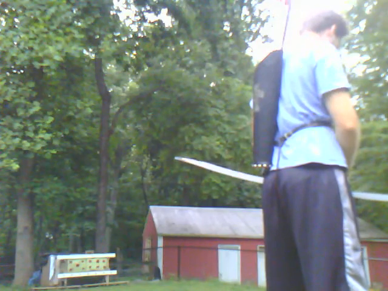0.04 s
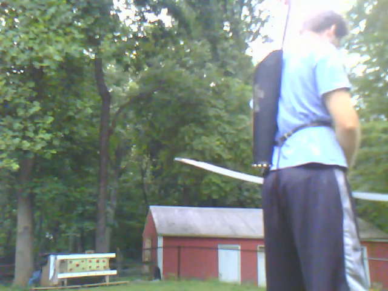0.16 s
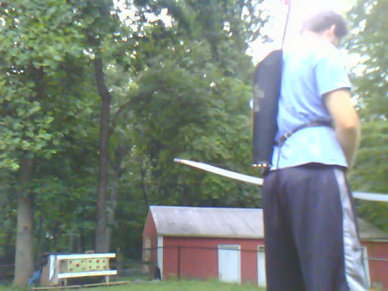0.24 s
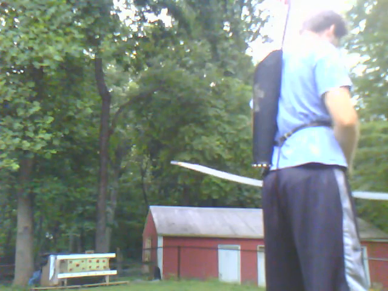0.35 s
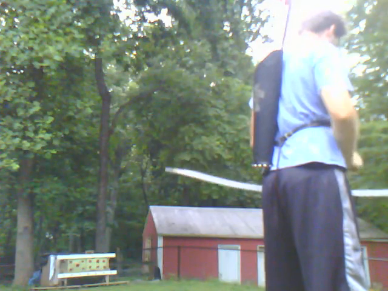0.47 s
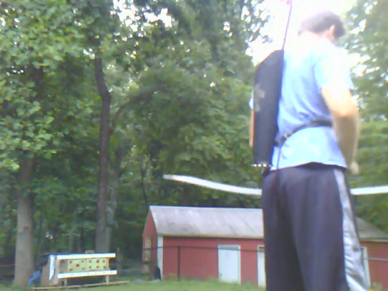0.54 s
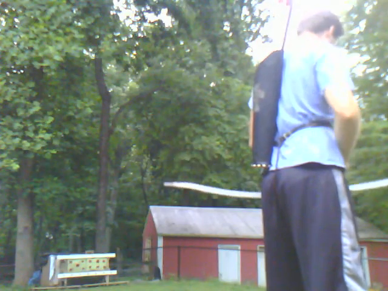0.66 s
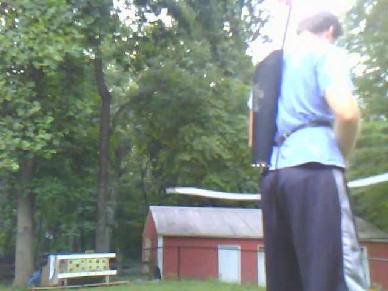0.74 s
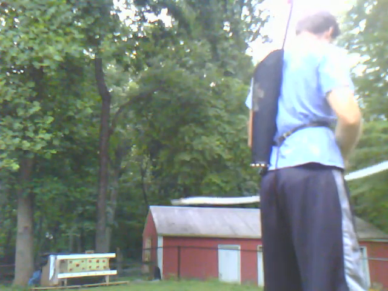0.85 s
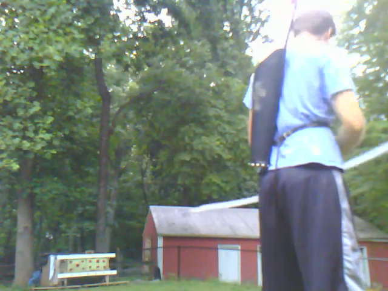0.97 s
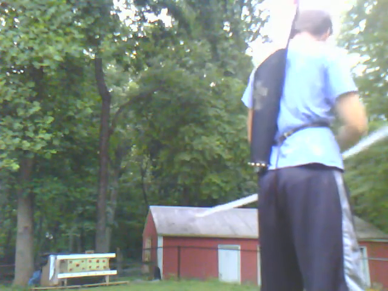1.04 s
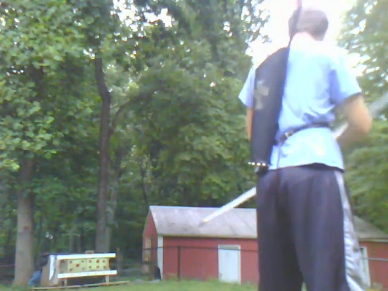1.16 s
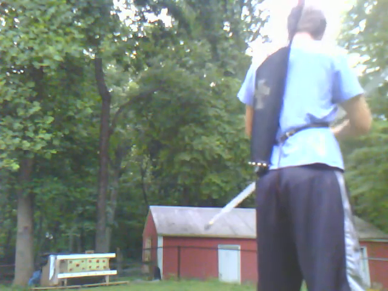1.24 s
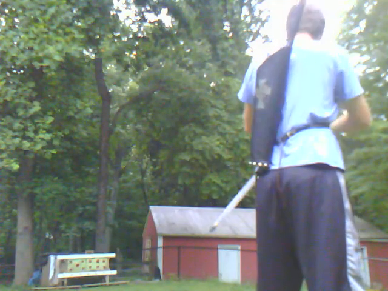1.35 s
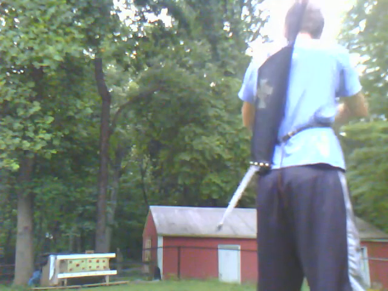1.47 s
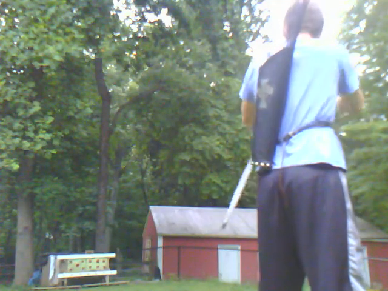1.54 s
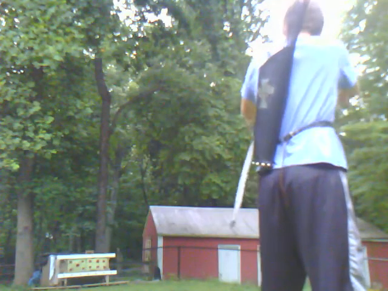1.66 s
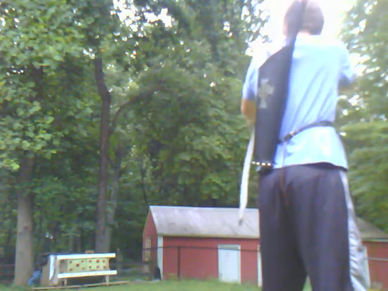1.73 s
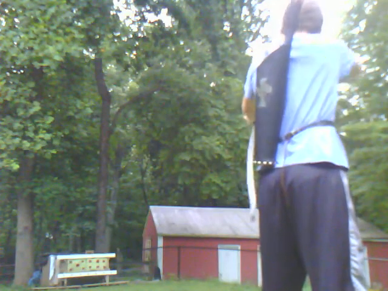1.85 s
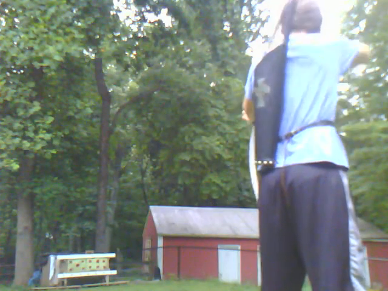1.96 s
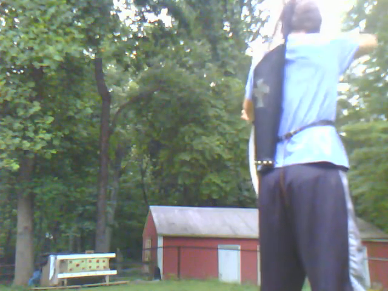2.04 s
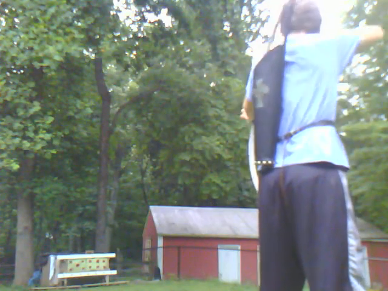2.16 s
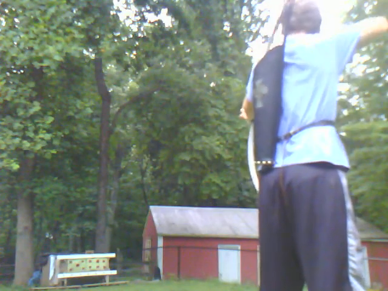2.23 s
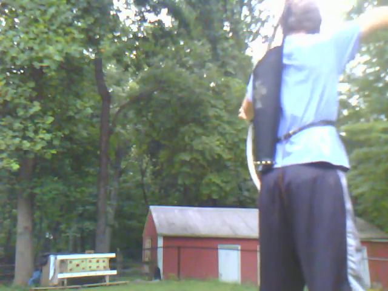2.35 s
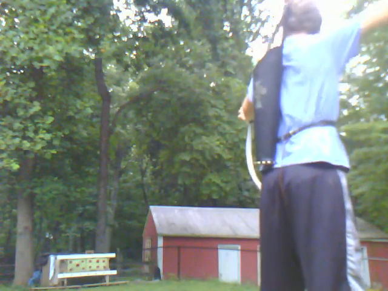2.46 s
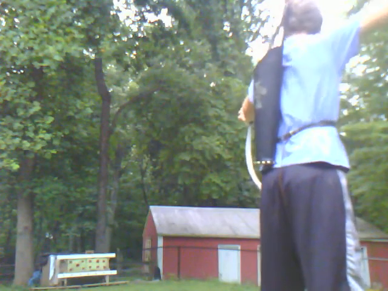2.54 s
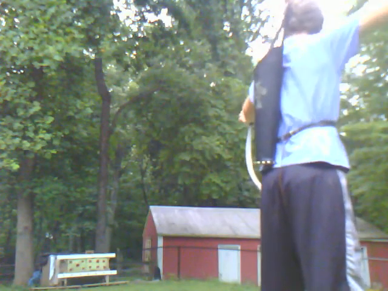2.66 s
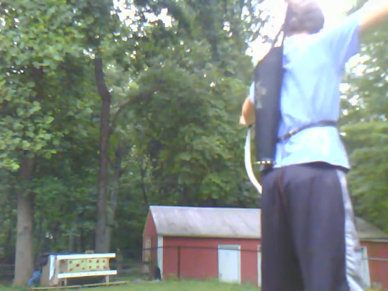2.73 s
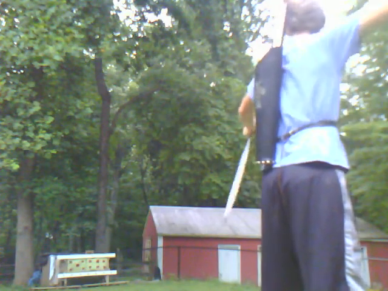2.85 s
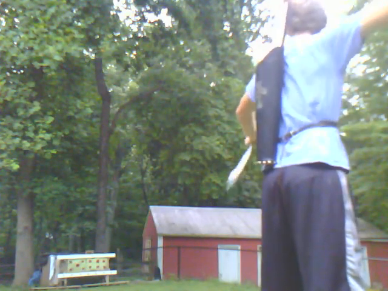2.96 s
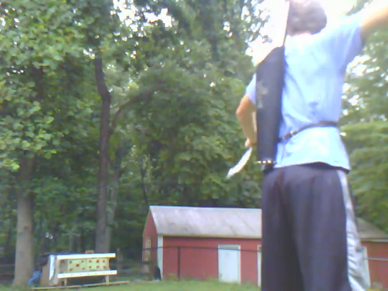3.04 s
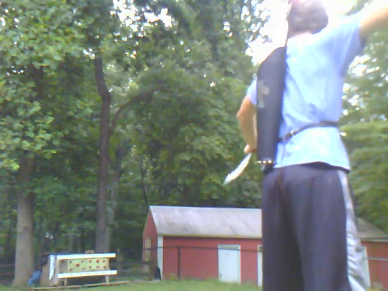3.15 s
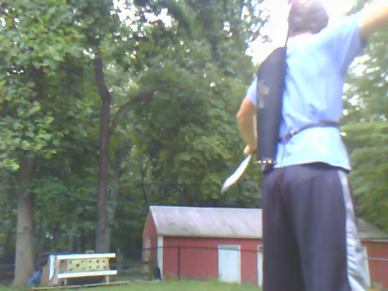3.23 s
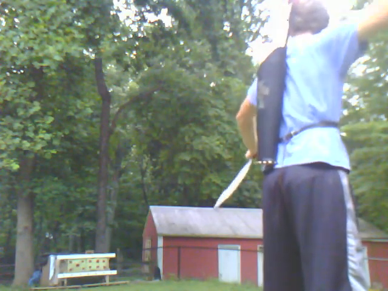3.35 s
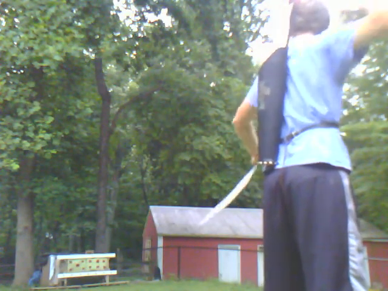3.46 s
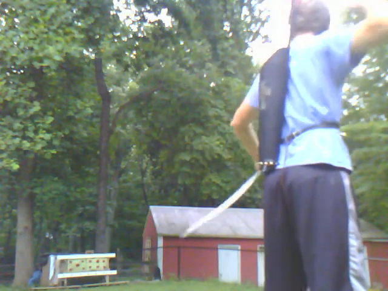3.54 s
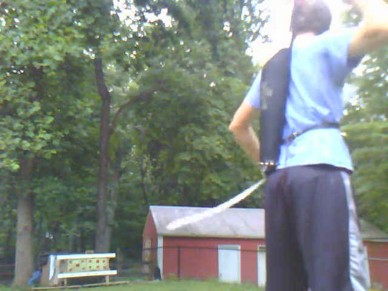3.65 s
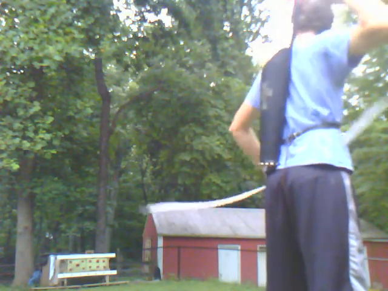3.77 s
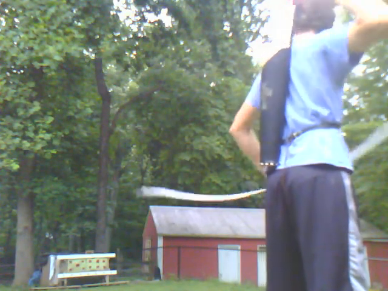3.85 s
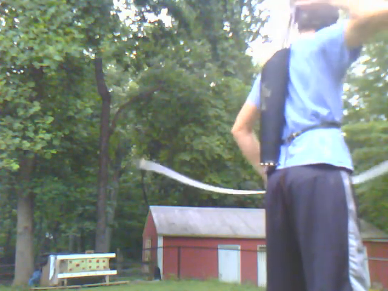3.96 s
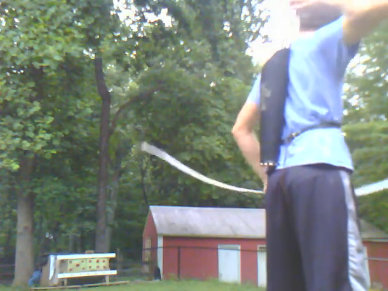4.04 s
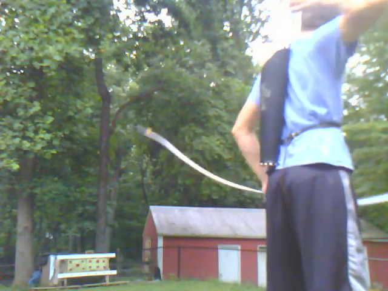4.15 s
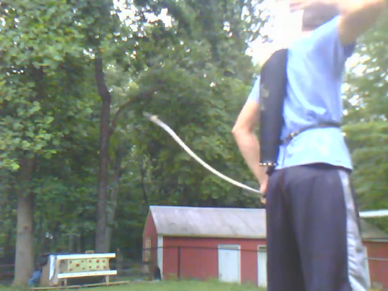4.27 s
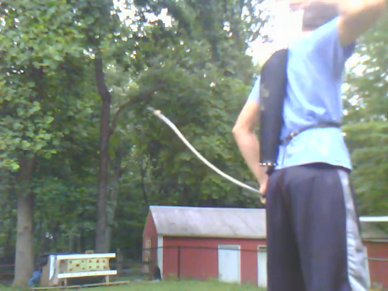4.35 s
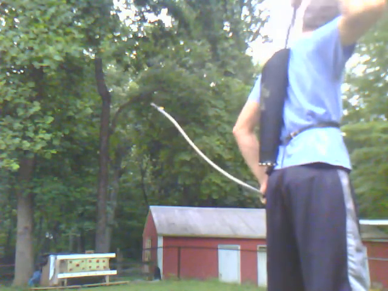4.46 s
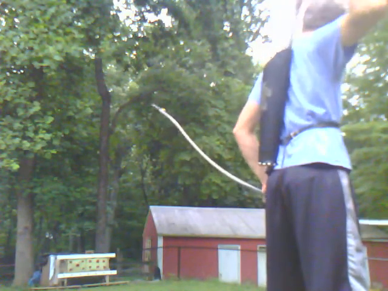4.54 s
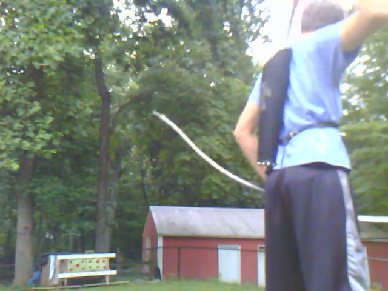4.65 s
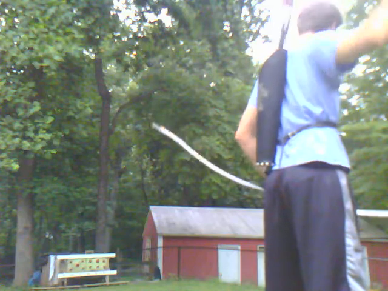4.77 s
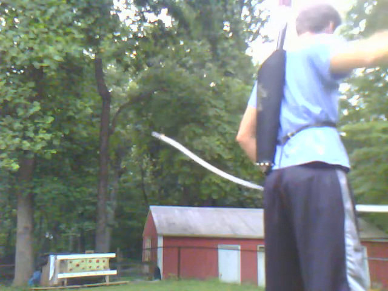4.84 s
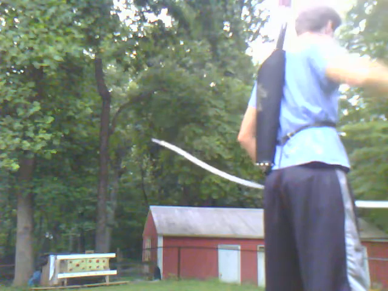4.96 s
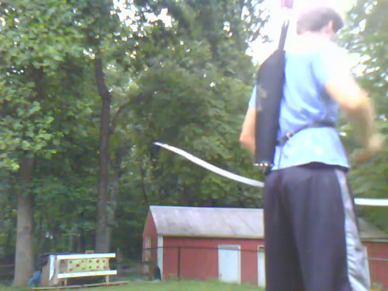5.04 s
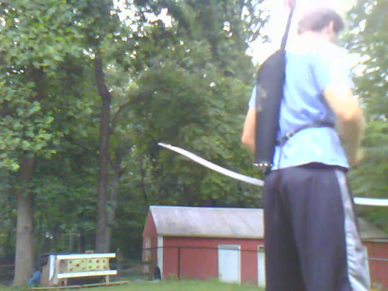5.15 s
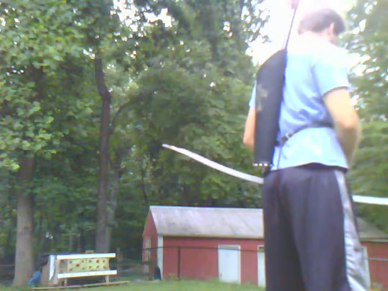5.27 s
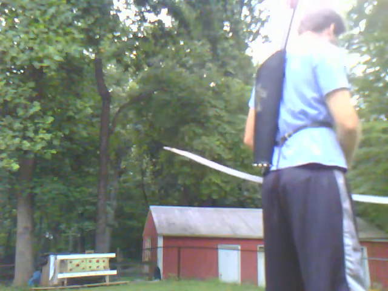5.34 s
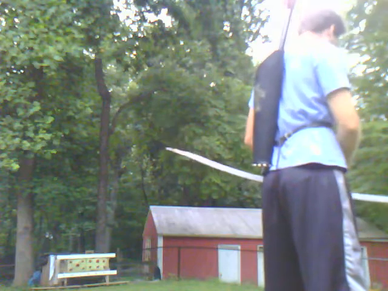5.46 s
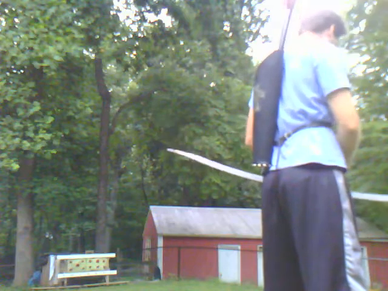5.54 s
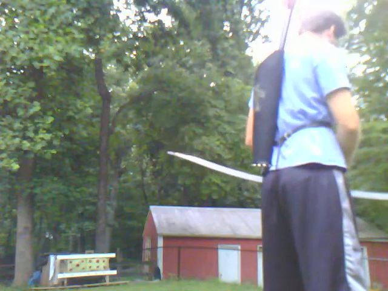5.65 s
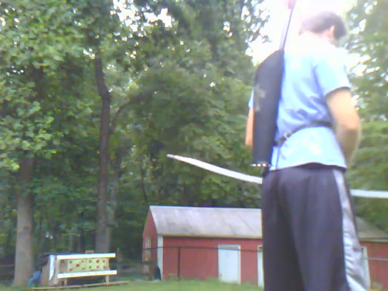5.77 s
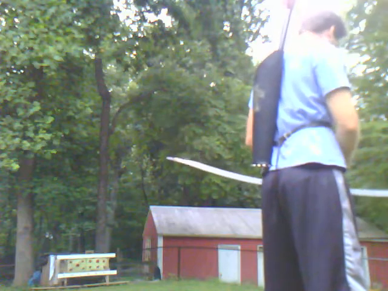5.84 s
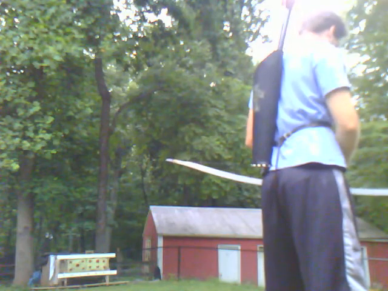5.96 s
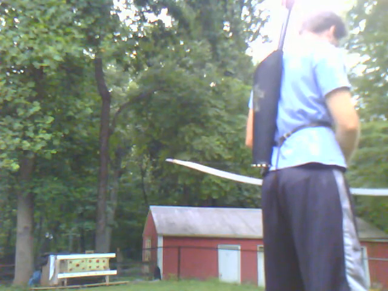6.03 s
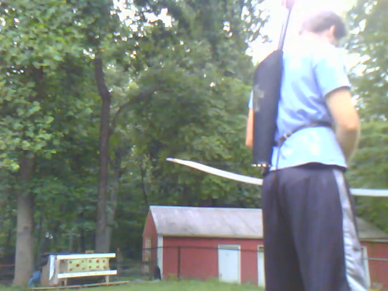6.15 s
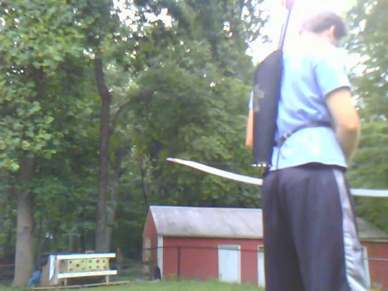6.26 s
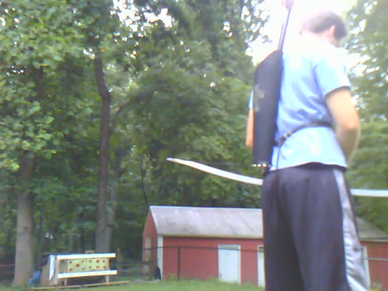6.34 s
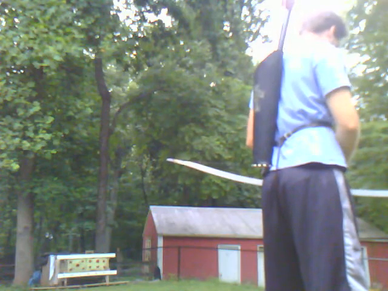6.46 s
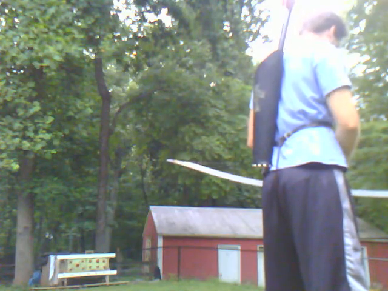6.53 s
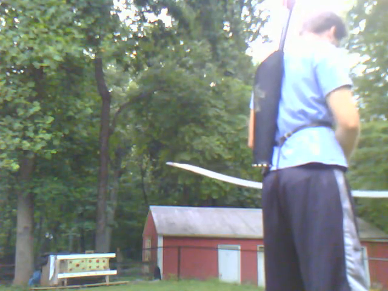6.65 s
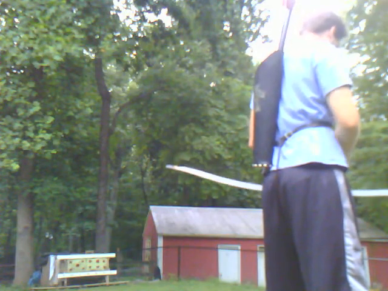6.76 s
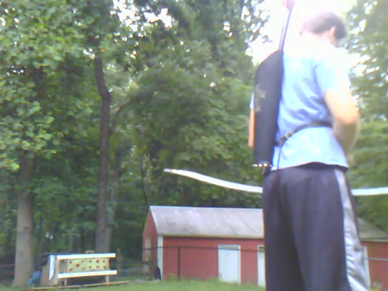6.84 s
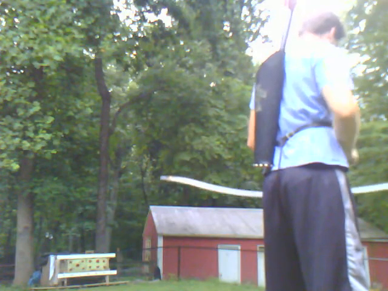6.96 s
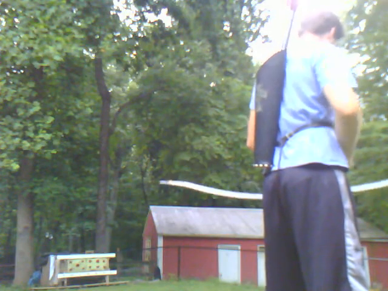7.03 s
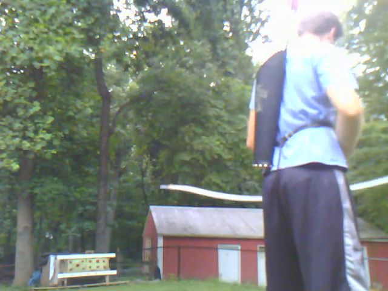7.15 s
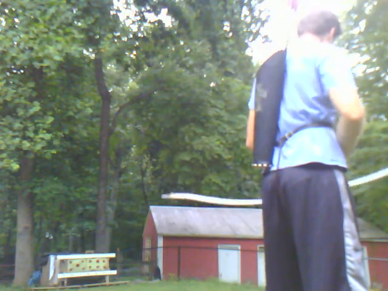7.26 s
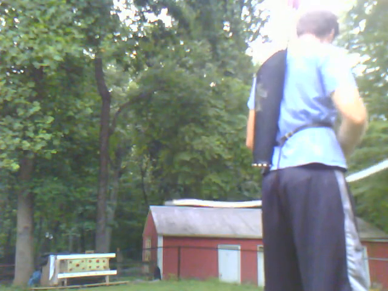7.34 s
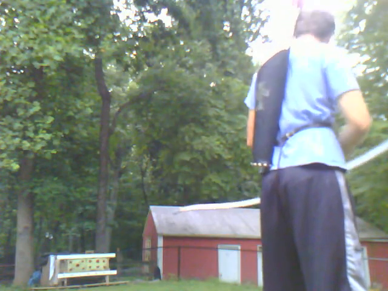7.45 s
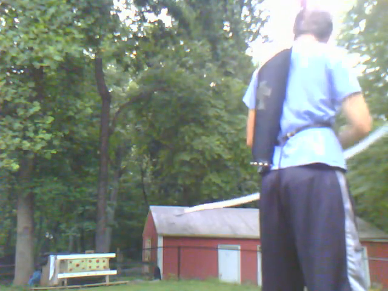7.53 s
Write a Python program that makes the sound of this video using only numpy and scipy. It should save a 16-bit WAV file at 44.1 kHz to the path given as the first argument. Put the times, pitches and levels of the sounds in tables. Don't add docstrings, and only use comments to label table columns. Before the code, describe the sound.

A bowstring snaps and an arrow thumps a wooden wall with a boom, then shafts rattle in a quiver as a songbird sings in a wooded yard.

```python
import sys
import numpy as np
from scipy import signal
from scipy.fft import rfft, irfft, next_fast_len
from scipy.io import wavfile
from scipy.ndimage import uniform_filter1d

SR = 44100
rng = np.random.default_rng(int(sys.argv[2]) if len(sys.argv) > 2 else 0)


def how_loud(loudness_db):
    steps = np.asarray(loudness_db, float) / 20
    return 10 ** steps


def inscribe(sig):
    pcm = np.round(np.clip(np.atleast_2d(sig).T, -1, 1) * 32767)
    wavfile.write(sys.argv[1], SR, pcm.astype(np.int16))


N = 335156
LEAD = SR // 2

# frequency_hz, density_db (per Hz)
AIR_SPECTRUM = [(12, -32.5), (20, -2.5), (42, -2), (74, -1.5), (98, -4), (130, -7.5), (240, -18.5),
                (261, -20), (637, -26), (1390, -30.5), (1650, -32), (2300, -31), (4760, -28.5), (5620, -37),
                (15800, -46)]
AIR_DB = -43.5
# centre_hz, width_hz, level_db
INSECTS = [(4668, 330, -58), (4107, 46, -66), (6270, 370, -67.5), (5050, 240, -69.5), (74.7, 8.2, -50.5)]
# pitch_hz, level_db
MOTOR_WHINE = [(1676, -68.5), (6728, -76), (11800, -84)]

# delay_s, level_db
ECHO_DECAY = [(.012, -2), (.07, -4.5), (.17, -8), (.2, -6), (.225, -10), (.3, -14), (.6, -27), (1.2, -52)]
# frequency_hz, gain_db
ECHO_TONE = [(100, -8), (500, -5), (1500, -4), (2500, -.1), (6500, -.1), (9000, -5), (15000, -14)]
# frequency_hz, gain_db
LEAF_TONE = [(4000, -.1), (5200, -4), (7000, -14)]
LEAF_S = .25

# start_s, length_s, from_hz, towards_hz, level_db
FAR_WHISTLES = [
    (3.825, .3, 3170, 3840, -34),
    (6.93, .21, 3620, 3750, -60),
    (7.12, .55, 3720, 4260, -58),
    (6.74, .13, 4030, 4020, -57),
    (6.93, .15, 2790, 2780, -64),
    (6.96, .12, 2560, 2480, -62),
    (7.11, .1, 2780, 2760, -69),
    (2.465, .16, 4000, 3970, -57),
    (2.51, .025, 2350, 2540, -55),
    (3.7, .13, 1980, 2260, -54),
]
# start_s, length_s, from_hz, towards_hz, level_db
HIDDEN_WHISTLES = [
    (3.69, .13, 2050, 2560, -62),
    (3.61, .016, 3700, 3300, -54),
    (3.624, .02, 3150, 2700, -58),
]
GLIDE, SWELL_DB, SAG_DB = 3.8, -11.5, -6

# time_s (from note start), pitch_hz
SWOOP = [(.008, 2780), (.015, 3000), (.024, 3140), (.033, 2920), (.045, 2400), (.06, 2140), (.095, 2270),
         (.105, 2300)]
FLICK = [(.143, 2350), (.15, 2520), (.16, 2740), (.17, 2720), (.177, 2660)]
HOLD = [(0, 3250), (.005, 3450), (.013, 3595), (.03, 3555), (.078, 3540), (.094, 3380), (.11, 3050),
        (.12, 2860)]
DIP = [(.15, 3550), (.157, 3500), (.17, 3465), (.18, 3320), (.186, 3200)]
CHIRP = [(-.028, 4900), (-.02, 5700), (-.013, 6600), (-.011, 6300), (-.007, 4700), (-.001, 3700)]
DROP = [(.007, 2050), (.014, 2300), (.023, 2530), (.035, 2030), (.05, 1600), (.068, 1470), (.093, 1450),
        (.104, 1420)]
# swoop_flick_s, hold_dip_s, chirp_drop_s, pitch_factor, effort_db
PHRASES = [
    (-.23, -.03, .1576, 1.006, -1.5),
    (.3073, .499, .6974, 1.001, -.9),
    (4.3132, 4.504, 4.6903, 1.0, -1),
    (4.832, 5.023, 5.215, 1.021, .1),
    (5.375, 5.567, 5.7689, 1.009, .3),
]
UPBEAT_S = 4.1695
# frequency_hz, gain_db
BEAK_TONE = [(1000, -.1), (3800, -.1), (4600, -13), (7000, -15)]
SING_DB, SING_HZ, DB_PER_OCTAVE, HOLD_DB_PER_OCTAVE = -26, 3600, 21, 11
SWOOP_DB, FLICK_DB, DIP_DB, CHIRP_DB, DROP_DB = 4, 7, -4.5, -1.5, 2.5
EDGE_DB, ATTACK_S, RELEASE_S = -18, .006, .004
TIRE_DB_PER_S = -22

# start_s, level_db
HIT = [
    (3.0351, -15.5),
    (3.047, -31),
    (3.053, -33),
    (3.094, -34.5),
    (3.123, -38),
]
# frequency_hz, density_db (per Hz)
BOARDS = [(59, -32), (100, -1.5), (758, -2), (1400, -16), (1920, -6), (2180, -14), (2420, -3.5), (3460, -5),
          (5630, -33), (7410, -19), (10200, -34), (15500, -51.5)]
# frequency_hz, density_db (per Hz)
HIT_TAIL = [(90, -30), (160, -14.5), (500, -13.5), (1100, -16.5), (1450, -17.5), (3800, -11.5), (8500, -23),
            (12500, -26.5), (14500, -45), (16000, -62)]
RETURN_DB, RETURN_T60, RETURN_LAG_S = -34.5, 0.95, 0.0054
# start_s, pitch_hz, level_db, t60_s
BOOMS = [
    (2.762, 99, -15, 0.049),
    (3.036, 208, -12.5, 0.022),
    (3.058, 73, -12, 0.044),
    (3.095, 110, -25, 0.044),
    (3.116, 71.6, -23, 0.079),
]

# time_s, pitch_hz, level_db
ZIP = [
    (2.752, 1350, -43),
    (2.755, 1850, -38),
    (2.762, 2230, -39),
    (2.766, 2150, -42),
]
# start_s, crack_db, thud_db, ring_db, ring_hz
RELEASE = [
    (2.7303, -43, -49, -35, 3870),
    (2.7439, -42, -49, -28, 3680),
    (2.7649, -39, -29, -27, 2610),
    (2.771, -51, -28, -31, 1420),
    (2.7774, -48, -41, -32, 1500),
    (2.7914, -37, -34, -38, 3000),
    (2.7993, -44, -26, -34, 1260),
    (2.8268, -48, -38, -37, 3270),
    (2.8891, -48, -44, -43, 4560),
    (2.9394, -48, -56, -40, 3750),
]
# frequency_hz, density_db (per Hz)
SNAP = [(300, -1), (1000, -1), (2200, -7), (4500, 3.5), (7000, -15.5), (11000, -15), (16000, -36.5)]
# time_s, pressure_db
WHIP = [
    (2.72, -54),
    (2.745, -72),
    (2.762, -44),
    (2.85, -64.5),
    (2.922, -59),
    (2.98, -74),
]

# start_s, crack_db, thud_db, ring_db
QUIVER = [(3.7757, -37, -39, -32), (3.7923, -44, -51, -35), (3.805, -41, -46, -28), (3.827, -36, -33, -30),
          (3.8416, -38, -34, -27), (3.988, -39, -53, -31), (4.0035, -42, -31, -31),
          (4.099, -35.5, -27, -28.5), (4.127, -49, -27.5, -37), (4.1583, -35.5, -48, -38),
          (4.1897, -54, -30, -39), (4.2133, -39.5, -58, -33), (4.3515, -36.5, -41, -32),
          (4.4185, -24, -35, -27), (4.4437, -42, -41, -40), (4.4645, -16.5, -6, -35),
          (4.4764, -30, -40, -28), (4.495, -28, -42.5, -37), (4.507, -18.5, -26, -23.5),
          (4.5513, -31.5, -39, -32.5), (4.578, -33, -43, -30), (4.5863, -30.5, -21.5, -32),
          (4.5981, -16.5, -27, -31), (4.6226, -26, -33, -32), (4.6576, -19.5, -34, -22.5),
          (4.6723, -22, -21.5, -24), (4.7646, -23, -45, -24.5), (4.8067, -29.5, -56, -30),
          (4.8618, -40, -34, -32.5), (4.899, -42, -38, -26.5)]
# from_s, to_s, rate_per_s, level_db
CHATTER = [
    (4.44, 4.63, 120, -35),
    (4.648, 4.69, 120, -36),
    (4.76, 4.85, 90, -44),
]
# frequency_hz, density_db (per Hz)
CRACK = [(600, -24), (1200, -7), (3000, 9.5), (5000, 1.8), (8000, 1), (11000, -9), (13500, -27),
         (16000, -51)]
# pitch_hz, level_db, t60_s
THUD = [(281, -5, 0.059), (484, -5, 0.03), (570, 1.5, 0.0084)]
# time_s, pressure_db
SLIDE = [(3.75, -72.5), (3.83, -64.5), (3.95, -71), (4.2, -57.5), (4.3, -70.5), (4.44, -60.5), (4.52, -47),
         (4.62, -47.5), (4.7, -74), (4.8, -64.5), (4.95, -71)]
HARD_DB, REBOUND_S, REBOUND_DB = -29.5, .005, -3
SHAFT_HZ, CRACK_HZ = (3200, 4400), (5300, 8000)

# start_s, crack_db, thud_db, ring_db, ring_hz
NOCK = [
    (.1411, -36, -42, -31, 3470),
    (5.5129, -37, -56, -50, 2790),
    (5.5523, -40, -64, -31, 3640),
    (6.4924, -43, -50, -36.5, 2830),
    (6.5774, -29, -47, -25, 4030),
    (7.155, -58, -38.5, -60, 3880),
    (6.7144, -52, -55, -49, 2840),
    (6.7994, -53, -60, -47, 2500),
    (6.9214, -50, -55, -47, 2900),
]
# pitch_hz, level_db, t60_s
NOCK_RING = [(2040, -20.5, 0.067), (2254, -12.5, 0.056)]


def evened(x):
    return x / np.sqrt(np.mean(x ** 2) + 1e-20)


def smooth_noise(length, size):
    return evened(uniform_filter1d(rng.standard_normal(length), size=size))


def coloured(x, points):
    f, db = np.transpose(points)
    size = next_fast_len(len(x))
    hz = np.fft.rfftfreq(size, 1 / SR)
    gain = how_loud(np.interp(np.log(hz + 1), np.log(f + 1), db))
    return irfft(rfft(x, size) * gain, size)[:len(x)]


def add(mix, s, sound):
    part = mix[round(s * SR):][:len(sound)]
    part += sound[:len(part)]


def level(rows, share=1, pivot_db=-50):
    s, db = np.transpose(rows)
    return how_loud(np.interp(np.arange(N) / SR, s, pivot_db + share * (db - pivot_db), -140, -140))


def ring(modes, t):
    return sum(how_loud(db - 60 * t / max(t60, .004)) * np.sin(2 * np.pi * hz * t) for hz, db, t60 in modes)


def whistle(rows, waver=0.0034):
    s, hz, db = np.transpose(rows)
    t = np.arange(s[0], s[-1], 1 / SR)
    hz = uniform_filter1d(np.interp(t, s, hz), size=200, mode="nearest")
    hz = hz * (1 + waver * smooth_noise(len(t), 300))
    tone = np.sin(2 * np.pi * np.cumsum(hz) / SR + 2 * np.pi * rng.random())
    envelope = how_loud(np.interp(t, s, db)) * signal.windows.tukey(len(t), .1)
    return s[0], np.sqrt(2) * envelope * tone


def echo(x):
    at = np.arange(400, int(1.2 * SR), 20)
    taps = np.zeros(at[-1] + 20)
    taps[at + rng.integers(0, 20, len(at))] = rng.choice([-1., 1.], len(at))
    taps *= how_loud(1.5 * smooth_noise(len(taps), 250))
    t = np.arange(len(taps)) / SR
    s, db = np.transpose(ECHO_DECAY)
    taps = coloured(taps * how_loud(np.interp(t, s, db)), ECHO_TONE)
    late = np.minimum(t / LEAF_S, 1)
    taps = (1 - late) * taps + late * coloured(taps, LEAF_TONE)
    return signal.fftconvolve(x, taps / np.linalg.norm(taps))[:len(x)]


def air():
    out = how_loud(AIR_DB - 1.5) * evened(coloured(rng.standard_normal(N), AIR_SPECTRUM))
    size = next_fast_len(N)
    f, t = np.fft.rfftfreq(size, 1 / SR), np.arange(N) / SR
    for hz, width, db in INSECTS:
        resonance = 1 / (1 + (2 * (f - hz) / width) ** 2)
        band = irfft(rfft(rng.standard_normal(size)) * resonance, size)[:N]
        swell = evened(uniform_filter1d(smooth_noise(N, 6000), size=6000))
        out += how_loud(db + 1.6 * swell) * evened(band)
    for hz, db in MOTOR_WHINE:
        wander = np.cumsum(rng.standard_normal(N)) * 0.018
        out += np.sqrt(2) * how_loud(db) * np.sin(2 * np.pi * hz * t + wander)
    return out


def glide(start, length, from_hz, to_hz, db):
    u = np.linspace(0, 1, num=13)
    hz = to_hz + (from_hz - to_hz) * np.exp(-GLIDE * u)
    swell = SWELL_DB * abs(2 * u - 1) ** 6 + SAG_DB * (u - .5)
    return np.transpose([start + length * u, hz, db + swell])


def far_birds():
    clear, hidden = np.zeros(N), np.zeros(N)
    for row in FAR_WHISTLES:
        add(clear, *whistle(glide(*row), waver=.004))
    for row in HIDDEN_WHISTLES:
        add(hidden, *whistle(glide(*row), waver=.025))
    return clear + hidden + how_loud(-7) * echo(clear + how_loud(8) * hidden)


def note(mix, start, shape, effort_db, pitch=1, slope=DB_PER_OCTAVE):
    s, hz = np.transpose(shape)
    ends = np.exp((s[0] - s) / ATTACK_S) + np.exp((s - s[-1]) / RELEASE_S)
    db = SING_DB + effort_db + slope * np.log2(hz / SING_HZ)
    db = db + EDGE_DB * ends + TIRE_DB_PER_S * (s - s.mean())
    add(mix, *whistle(np.transpose([LEAD / SR + start + s, pitch * hz, db])))


def songbird():
    out = np.zeros(N + LEAD)
    for first, second, third, pitch, db in PHRASES:
        note(out, first, SWOOP, db + SWOOP_DB)
        note(out, first, FLICK, db + FLICK_DB)
        note(out, second, HOLD, db, pitch, HOLD_DB_PER_OCTAVE)
        note(out, second, DIP, db + DIP_DB, pitch)
        note(out, third, CHIRP, db + CHIRP_DB, slope=-9)
        note(out, third, DROP, db + DROP_DB)
    note(out, UPBEAT_S, DROP, DROP_DB - 4.0)
    return (coloured(out, BEAK_TONE) + how_loud(-10.5) * echo(out))[LEAD:]


def knocks(rows, colour, crack_t60, ring_t60, body=()):
    out, t = np.zeros(N), np.arange(4096) / SR
    late = t - 200 / SR
    for s, crack_db, thud_db, ring_db, hz in rows:
        crack_hz = rng.uniform(*CRACK_HZ)
        noise, spread = rng.standard_normal(len(t)), rng.uniform(0.94, 1.07, 3)
        fade = how_loud(-60 * late / crack_t60) + 1.8 * how_loud(-60 * late / .002)
        crack = coloured(noise * (late > 0) * fade, colour)
        crack = np.roll(crack / abs(crack).max(), -200)
        crack = crack + ring([(crack_hz, -7.5, .012)], t) * np.minimum(t / 0.00025, 1)
        modes = [(hz, 0, ring_t60), (hz * .72 * spread[0], -4.5, ring_t60), (hz * 1.2 * spread[1], -7.5, ring_t60)]
        shaft = (ring(modes, t) + ring(body, t)) * np.minimum(t / 0.00045, 1)
        thud = ring(THUD, t * (.75 + spread[2] / 4)) * np.minimum(t / .0018, 1)
        add(out, s + .0004, how_loud(crack_db + 1.5) * crack + how_loud(ring_db + 5.0) * shaft)
        add(out, s + 0.002, how_loud(thud_db - 4.5) * thud)
    return out


def scrape(rows, bright, rumble_db, share, per_s=900, spread_db=5.5):
    slips = (rng.random(N) < per_s / SR) * how_loud(spread_db * np.minimum(rng.exponential(1, N), 4))
    gate = signal.lfilter([1], [1, -np.exp(-1 / (.0025 * SR))], slips) + .3
    hiss = evened(coloured(gate * rng.standard_normal(N), bright))
    dull = [(100, -39), (260, 4.0), (550, -6.0), (900, -11.5), (2000, -23), (5000, -57)]
    rumble = evened(coloured(rng.standard_normal(N), dull))
    return how_loud(4.0) * level(rows) * hiss + how_loud(rumble_db) * level(rows, share) * rumble


def rattle():
    rows = np.array(QUIVER)
    hard = rows[rows[:, 1] > HARD_DB]
    scatter = rng.standard_normal(hard.shape) * [.001, 4.7, 2.2, 0.75]
    parts = [rows, hard + [REBOUND_S, REBOUND_DB, -8, REBOUND_DB] + scatter]
    for start, end, per_s, db in CHATTER:
        u = rng.random((int((end - start) * per_s), 4))
        times = start + (end - start) * u[:, 0]
        levels = db + 14 * (u[:, 1:] - .5) + [0, -8.0, 4.0]
        parts.append(np.column_stack([times, levels]))
    rows = np.vstack(parts)
    return np.column_stack([rows, rng.uniform(*SHAFT_HZ, len(rows))])


def quiver():
    return knocks(rattle(), CRACK, .024, .011) + scrape(SLIDE, CRACK, rumble_db=11.5, share=0.86)


def nocking():
    return knocks(NOCK, SNAP, 0.065, 0.015, NOCK_RING)


def zip_by():
    out = np.zeros(N)
    add(out, *whistle(ZIP, waver=0.062))
    add(out, *whistle(np.array(ZIP) * [1, 1.8, 1] - [0, 0, 4.5], waver=0.039))
    return out


def bow():
    whip_tone = [(500, -22), (1700, 1.0), (4500, 8.0), (8000, -18), (15000, -25.0)]
    whip = scrape(WHIP, whip_tone, rumble_db=10.0, share=.9)
    return knocks(RELEASE, SNAP, .016, .013) + whip + zip_by()


def hit():
    out, t = np.zeros(N), np.arange(4096) / SR
    burst = np.minimum(t / .001, 1) * how_loud(-60 * np.maximum(t - .005, 0) / .016)
    for s, db in HIT:
        strike = coloured(np.roll(burst, 200) * rng.standard_normal(len(t)), BOARDS)
        add(out, s - 200 / SR, how_loud(db - 12.0) * evened(strike))
    grain = how_loud(1.3 * smooth_noise(N, 150))
    back_s = HIT[0][0] + RETURN_LAG_S
    decay = level([(back_s, RETURN_DB), (back_s + RETURN_T60, RETURN_DB - 60)])
    woods = decay * grain * rng.standard_normal(N)
    tail = coloured(woods, HIT_TAIL)
    tail *= np.linalg.norm(woods) / np.linalg.norm(tail)
    dull = coloured(tail, [(6000, -3.5), (9000, -7.0), (14000, -20)])
    far = np.clip((np.arange(N) / SR - HIT[0][0]) / .2, 0, 1)
    out += (1 - far) * tail + far * dull
    for s, hz, db, t60 in BOOMS:
        add(out, s, ring([(hz, db, t60)], t) * np.minimum(t / 0.0037, 1))
    return out


def scene():
    background = air() + far_birds() + songbird()
    close = quiver() + nocking() + bow()
    return (background + close + how_loud(-17.5) * echo(close) + hit())[None]


def band_limit(x):
    return signal.sosfilt(signal.butter(12, 15950, fs=SR, output="sos"), x)


def record(dry):
    limit = signal.firwin(511, 15900, window=("kaiser", 9), fs=SR)
    mix = signal.oaconvolve(dry, limit[None], "same")
    return band_limit(mix)


dry = scene()
out = record(dry)
inscribe(out)
```